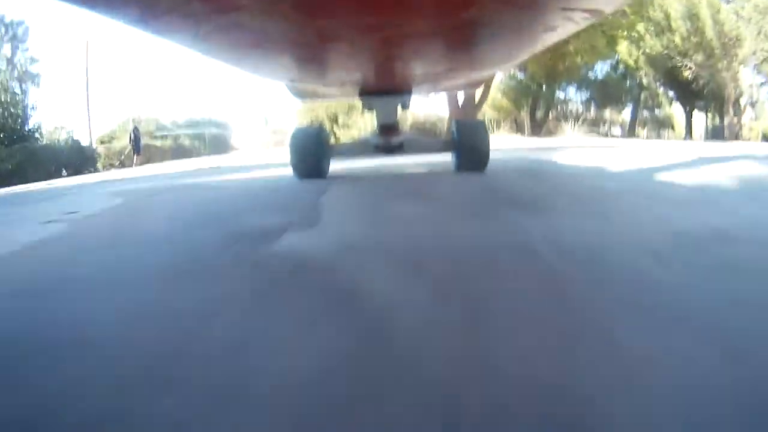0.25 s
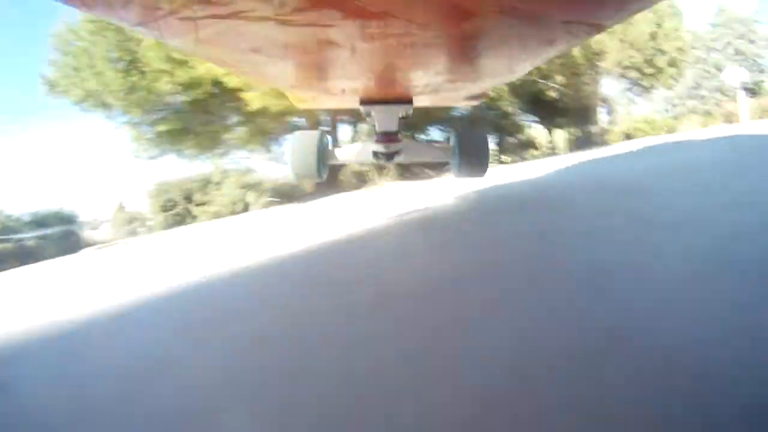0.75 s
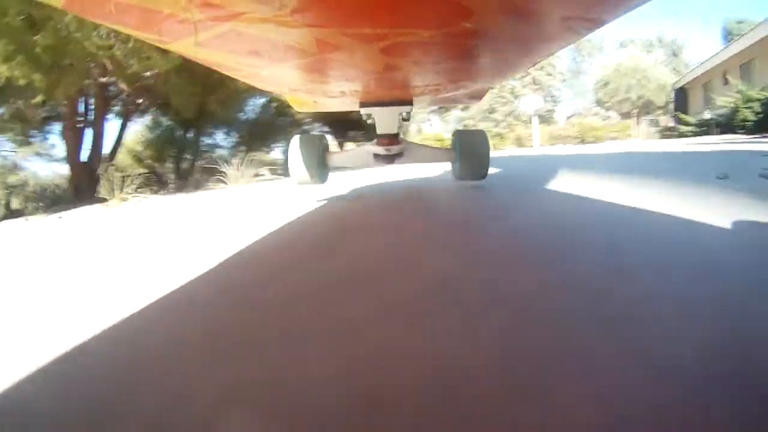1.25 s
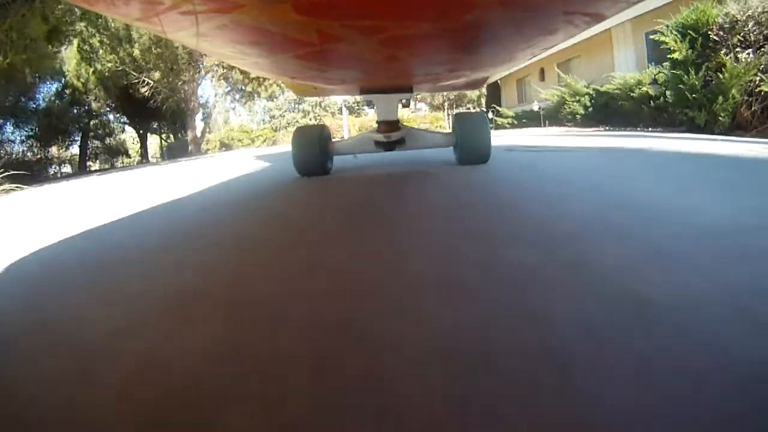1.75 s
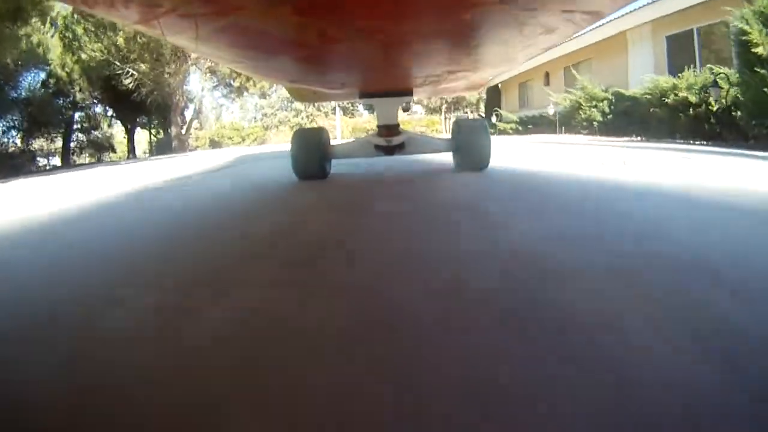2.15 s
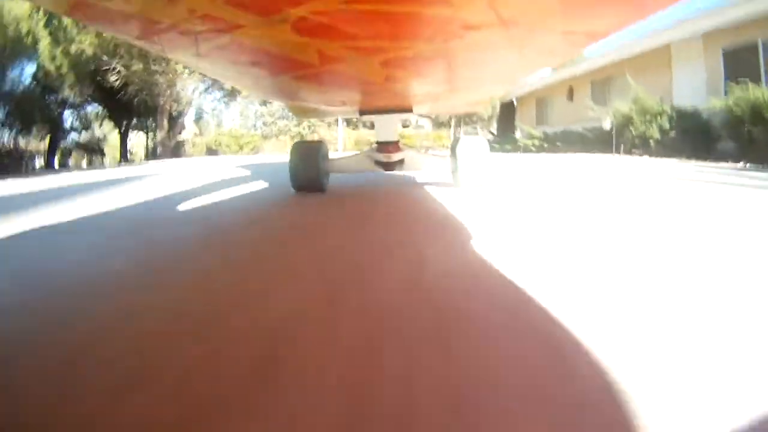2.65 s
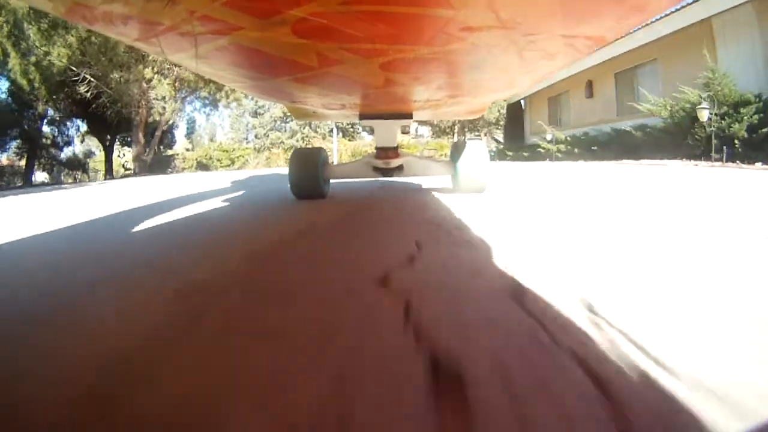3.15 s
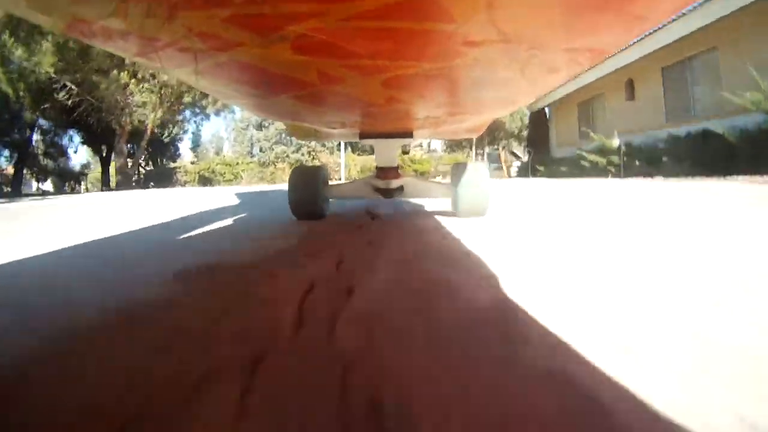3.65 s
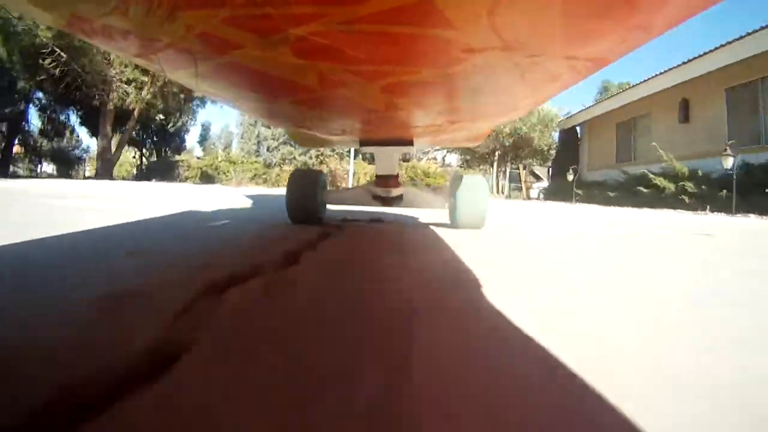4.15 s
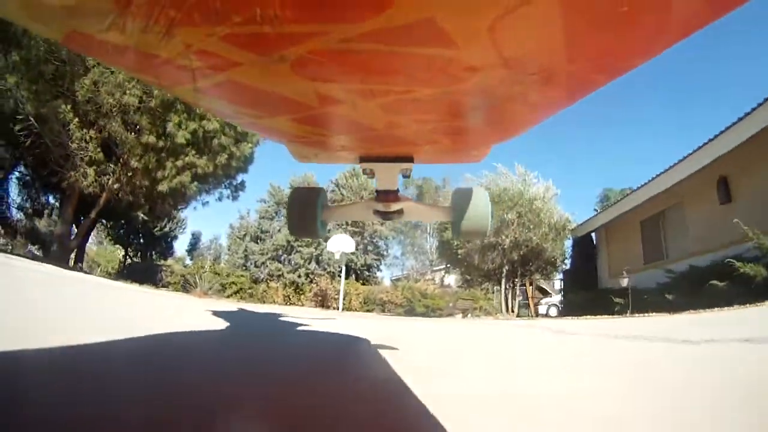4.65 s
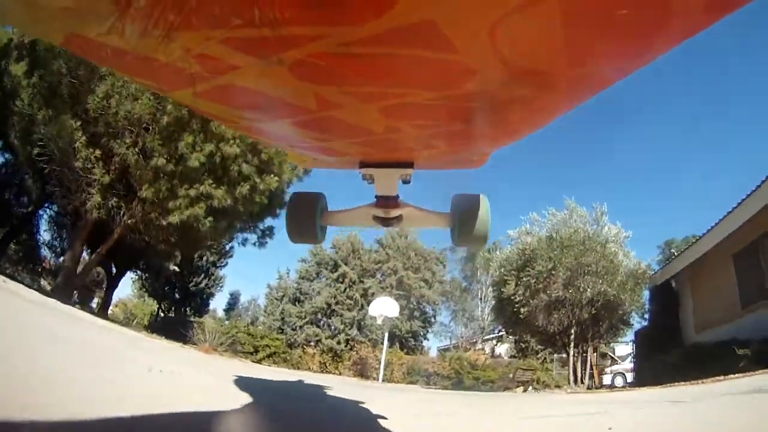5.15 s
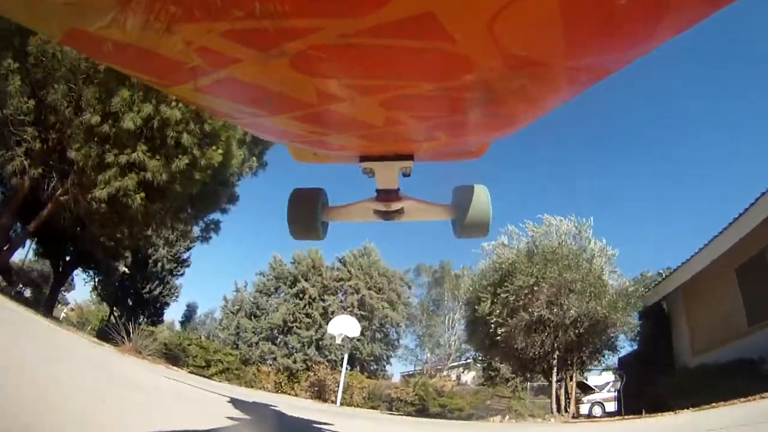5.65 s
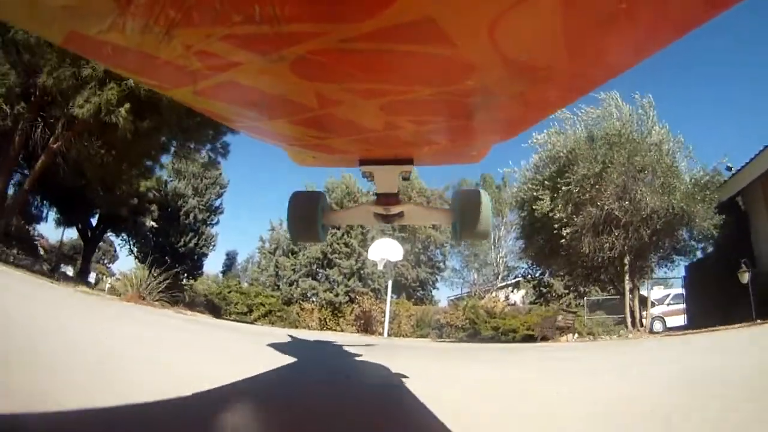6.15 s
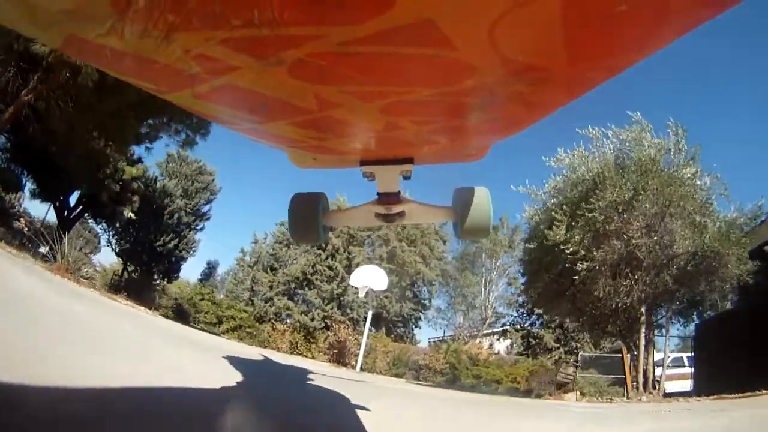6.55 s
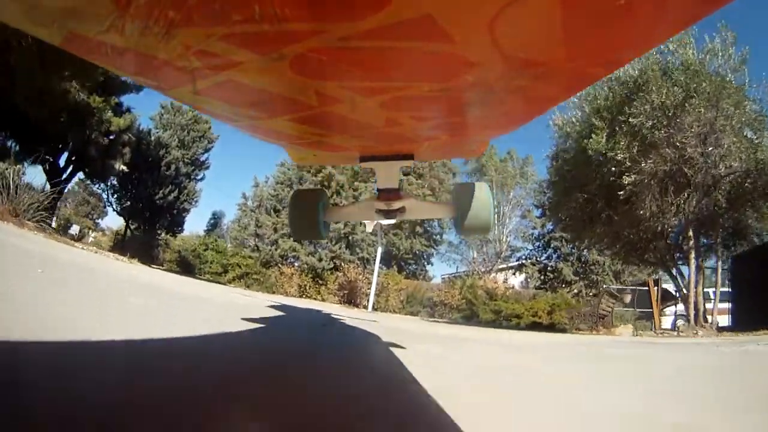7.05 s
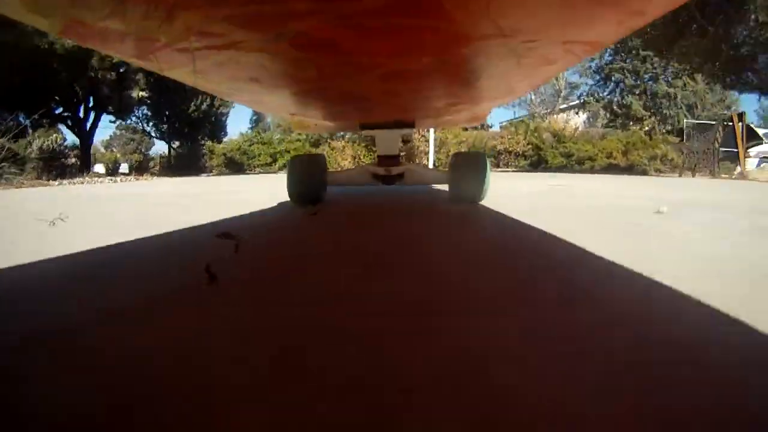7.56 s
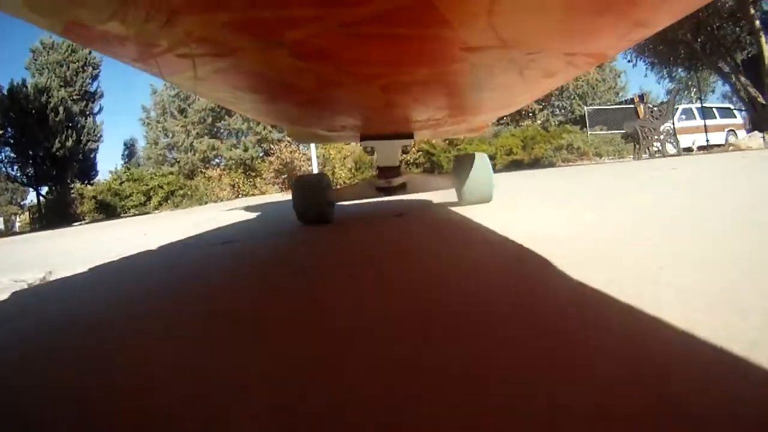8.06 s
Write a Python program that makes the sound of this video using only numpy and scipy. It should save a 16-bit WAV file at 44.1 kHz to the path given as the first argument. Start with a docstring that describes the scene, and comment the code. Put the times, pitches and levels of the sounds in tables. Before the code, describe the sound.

A microphone fixed under a skateboard deck catches hard wheels rolling on outdoor concrete: a low woody rumble, gritty hiss, rattling trucks and irregular clacks at cracks. A big bang comes as the nose lifts, then the roll turns duller and humming on the rear wheels. The tail scrapes roughly, briefly scrapes again, and the board slams back onto four wheels and rolls on.

```python
"""Wheels rumble and clack over concrete while loose metal rattles, heard by a camera under a skateboard's deck.
Noise drives the resonances of deck, wheels and trucks; single pushes make the clacks, and grit ticks.
Bearings chatter, turning tyres rasp, one wheel squeaks and wind flutters. Later the board rides on its
rear wheels, scrapes its tail twice and drops back. The camera turns loud sound down, clips it and
holds its samples coarsely, which adds a mirrored treble."""
import sys
import numpy as np
from scipy import signal
from scipy.fft import rfft, irfft
from scipy.io import wavfile
from scipy.ndimage import uniform_filter1d

SR = 44100
rng = np.random.default_rng(int(sys.argv[2]) if len(sys.argv) > 2 else 0)


def dump_mix(stems):
    """Bounce the given channels to the path in sys.argv[1] as a 16-bit WAV at rate SR."""
    frames = np.atleast_2d(stems).T  # one column per channel
    limited = np.clip(frames, -1, 1)  # hard clip at full scale
    pcm = np.round(limited * 32767).astype(np.int16)
    wavfile.write(sys.argv[1], SR, pcm)


N = 366471
TIME = np.arange(N) / SR  # seconds

# How hard the ground shakes the board, before patches and shudders.
# Each row: time in seconds, level in dB.
ROLL = [(0, -24.5), (.2, -36.5), (.36, -18.5), (.8, -20.5), (1.4, -25), (1.86, -16.5), (2.5, -23),
        (3.1, -22.5), (3.8, -23), (4.3, -16), (4.5, -21), (4.7, -17.5), (5.35, -15.5), (5.97, -23),
        (6.85, -19.5), (7.2, -14), (7.66, -20.5), (8, -15.5), (8.3, -17)]
# Rough, bumpy or sandy patches of concrete.
# Each row: middle in seconds, length in seconds, extra rumble in dB, extra bounce in dB, extra grit in dB.
PATCHES = [(0.506, 0.68, -2, 7, 1.5), (0.752, 0.18, 3.5, 1, 5), (1.112, 0.084, 2, 13, 9),
           (1.283, 0.14, 8.5, 15.5, 8), (2.024, 0.6, 2.5, 7, -0.5), (2.27, 0.15, 10, 10.5, 9.5),
           (2.46, 0.62, 2.5, 11.5, 3.5), (3.117, 0.37, 5.5, 15, 7), (3.4, 0.32, 5.5, 7.5, 8),
           (3.63, 0.24, 6.5, 20, 8.5), (3.99, 0.22, -1, 6, 0.5), (4.197, 0.21, 5, 7.5, 5),
           (4.776, 0.47, 4.5, 5, 10), (5.242, 0.21, 2.5, 6, 8), (5.833, 0.29, 5.5, 10.5, -0.5),
           (6.159, 0.33, 9.5, 15, 5), (6.476, 0.3, 7.5, 14, 5.5), (7.028, 0.23, 2, -12, 3.5),
           (7.293, 0.078, 7, 9, 5), (7.474, 0.21, 2, 17, 6.5), (7.777, 0.3, 2, 9.5, 4.5),
           (8.076, 0.14, -1, -12, 2.5), (8.236, 0.4, -3, 6, -2.5)]
# Wheels striking seams and cracks, tail and nose touching down.
# Each row: time in seconds, blow in dB, truck crack in dB relative to the blow,
# lift of the deck's high resonances in dB, thud on the wheels in dB relative to the deck's boom.
CLACKS = [(0.0868, 3.5, -3, -1, -19), (0.1026, 2.5, -4, 1, -30), (.139, 4, -16, -8, -13),
          (0.41, -3, -30, 4, -11), (0.581, -0.5, -27, -18, -10), (0.665, -2.5, -9, -4, -17),
          (0.706, -10.5, -18, -8, -20), (0.75, -3.5, -12, -6.5, -14), (0.849, -2.5, -20, -1, -7),
          (.951, -6.5, 1, -6, -28), (.957, 4.5, -14, 8.5, -32), (0.978, 2.5, -8, -8, -12.5),
          (1.115, -0.5, -8, -2, -20), (1.1235, 0.5, -8.5, -3.5, -31), (1.192, -5, -27, -4, -6),
          (1.240, -7, 2.5, -10, -10), (1.261, -5, 0.5, 5.5, -22), (1.4562, 11.5, -14, 2.5, -25),
          (1.466, 4.5, -9, 1, -28), (2.041, -0.5, -13, 4.5, -13), (2.0722, 6, -9, -9, -15),
          (2.197, -1, -9, -8, -23), (2.227, 1, -16, 7, -26), (2.241, 2, -3.5, -1, -25),
          (2.403, -1, -16, -21, -28), (2.415, 5, -9, -3.5, -7.5), (2.519, 4, -9, 3.5, -5),
          (2.6866, 8, -13.5, -5, -6.5), (2.703, -1, -7, -8, -7.5), (3.231, -6, -6, 2.5, -2),
          (3.498, 8.5, -10, -3, -7), (3.673, 6, -12, -5.5, -25), (4.37, -1.5, -9, 1, -16),
          (4.3838, 17, -20.5, -5.5, -24), (5.379, 3, -3, 19, -19), (5.668, 2, -8, 11, -19),
          (6.7348, -2, -2, 4, -19), (7.542, -3.5, -3, 5, -16), (7.6013, 16, -11, -1, -19.5),
          (7.771, 2.5, -12, -1.5, -3)]
# Resonances of the board bouncing on its wheels. Each row: pitch in Hz, width in Hz, strength in dB.
BOUNCE = [(84, 16, -11.5), (96, 58, 2), (152, 50, -2.5), (235.5, 37, -5.5)]
# Resonances of the metal trucks that hold the wheels. Each row: pitch in Hz, width in Hz, strength in dB.
TRUCK = [(1480, 4800, -8.5), (2910, 960, -3), (2950, 106, -13), (3610, 1540, -1), (5800, 3600, -7.5)]


def undb(db):
    """Turn decibels into a gain."""
    return 10 ** (np.asarray(db) / 20)


def unit(x):
    """Scale a signal to an rms (average strength) of 1."""
    return x / np.sqrt(np.mean(x ** 2))


def curve(rows):
    """Join rows of seconds and dB by straight lines; gives the gain at every sample."""
    return undb(np.interp(TIME, *np.transpose(rows)))


def walk(rate):
    """Wander at random with an rms of 1, moving in straight lines to a new level rate times a second."""
    step = int(SR / rate)
    levels = rng.standard_normal(N)[:N // step + 1]
    return unit(uniform_filter1d(np.repeat(levels, step), step)[:N])


def hump(middle_s, length_s):
    """A smooth rise and fall with a peak of 1."""
    shape = np.zeros(N)
    ends = np.searchsorted(TIME, [middle_s - length_s / 2, middle_s + length_s / 2])
    inside = slice(*ends)
    shape[inside] = np.cos(np.pi * (TIME[inside] - middle_s) / length_s) ** 2
    return shape


def swells(rows):
    """Add up smooth swells of gain from rows of middle in seconds, length in seconds and dB."""
    return sum(undb(db) * hump(s, length_s) for s, length_s, db in rows)


def response(modes, size=8192):
    """How a body with these resonances answers one sharp push; its peak is 1."""
    f = np.arange(size // 2 + 1) * SR / size
    power = sum(undb(db) ** 2 / (1 + (2 * (f - hz) / width) ** 2) ** 2 for hz, width, db in modes)
    # folding the cepstrum makes the ringing start at the push, never before it
    cepstrum = irfft(np.log(power) / 2)
    cepstrum[1:size // 2] *= 2
    cepstrum[size // 2 + 1:] = 0
    h = irfft(np.exp(rfft(cepstrum)))
    return h / np.abs(h).max()


def ring(force, modes):
    """Drive a resonant body with a force."""
    return signal.oaconvolve(force, response(modes))[:N]


def grains(rate, spread_db):
    """Random tiny impacts, about rate a second: most are small, a few are large."""
    hit = rng.random(N) < rate / SR
    size = undb(spread_db * np.minimum(rng.exponential(size=N), 4))
    return hit * size * rng.choice([-1, 1], N)


def contact(chatter, rise_s, decay_s, size=4096):
    """One push in mid-frame; noisy chatter swells as the wheel climbs the edge and dies as parts settle."""
    t = (np.arange(size) - size // 2) / SR
    force = chatter * rng.standard_normal(size) * np.exp(np.minimum(t / rise_s, -t / decay_s))
    force[size // 2] += 1
    return force


def add(track, sound, s, size=4096):
    """Mix in a sound whose contact lies half a frame in, so that the contact falls at time s."""
    place = np.arange(len(sound)) + int(s * SR) - size // 2
    inside = (place >= 0) & (place < N)
    track[place[inside]] += sound[inside]


def blows(times, dbs, chatter, rise_s, decay_s):
    """The force of a row of contacts."""
    force = np.zeros(N)
    for s, db in zip(times, dbs):
        add(force, undb(db) * contact(chatter, rise_s, decay_s), s)
    return force


def deck_modes(struck, lift_db=0):
    """The deck rings in other proportions when struck than when rolling; a sharp edge lifts its high pitches."""
    # Each row: pitch in Hz, width in Hz, strength when rolling in dB, strength when struck in dB.
    deck_rows = [(146, 105, -11.5, -3.5), (232, 122, -15, 0.5), (315, 65, -1.5, -3), (421, 204, -2.5, -1.5),
                 (534, 142, -0.5, 3), (597, 161, 2, -16), (715, 194, -29, -5), (1038, 245, -12.5, -6.5),
                 (1418, 177, -22, -14), (1960, 900, -31, -26.5)]
    modes = []
    for hz, width, rolling_db, struck_db in deck_rows:
        db = struck_db if struck else rolling_db
        modes.append((hz, width, db + lift_db * (hz > 900)))
    return modes


def nose_up():
    """Give 1 while the board rides on its rear wheels alone and 0 on all four, tilting steadily between."""
    up_s, down_s, tilt_s = 4.45, 7.55, 0.1
    return np.clip(np.minimum(TIME - up_s, down_s - TIME) / tilt_s + .5, 0, 1)


def shaken(level_db, decay_s):
    """Every clack sets off a shaking that soon dies away; level_db is for a 0 dB blow."""
    jolts = np.zeros(N)
    for s, db, *_ in CLACKS:
        jolts[int(s * SR)] = undb(level_db + db / 2)
    return signal.lfilter([1], [1, -np.exp(-1 / (decay_s * SR))], jolts)


def patches():
    """Extra rumble, bounce and grit in dB at every moment, as the patches pass under the wheels."""
    shapes = np.array([hump(s, length_s) for s, length_s, *_ in PATCHES])
    return np.transpose(PATCHES)[2:] @ shapes


def rolling():
    """Rough ground shakes the deck, bounces the soft wheels and hisses in the trucks; a lifted nose hums."""
    # Resonances of the freely swinging nose. Each row: pitch in Hz, width in Hz, strength in dB.
    nose_modes = [(90.6, 11, 3), (160.6, 15.4, 1), (338, 68, -2.5)]
    nose_db = -9.5  # relative to the ground's shaking
    bounce_db, lifted_bounce_db = -6, -8.5  # likewise, and its change with the nose up
    hiss_db, lifted_grit_db = -18, -9  # likewise
    # the whole board shudders briefly after a clack
    ground = np.hypot(curve(ROLL), shaken(level_db=-30, decay_s=0.03))
    lifted = nose_up()
    rough_db, bumpy_db, sandy_db = patches()
    texture = walk(rate=55)  # rougher and smoother spots pass under the wheels

    deck_force = rng.standard_normal(N) * undb(1.4 * texture)
    deck = unit(ring(deck_force, deck_modes(struck=False))) * undb(rough_db)

    wheels_level = undb(bounce_db + bumpy_db + lifted_bounce_db * lifted)
    wheels = unit(ring(rng.standard_normal(N), BOUNCE)) * wheels_level

    nose = unit(ring(rng.standard_normal(N), nose_modes)) * undb(nose_db) * lifted

    hiss_force = rng.standard_normal(N) * undb(4.3 * texture)
    hiss_level = undb(hiss_db + sandy_db + lifted_grit_db * lifted)
    hiss = unit(ring(hiss_force, TRUCK)) * hiss_level
    return (deck + wheels + nose + hiss) * ground


def taps(size=2000):
    """A loose part bounces at a roughly even rate, each tap with its own strength."""
    rate_hz, gap_spread_db, strength_spread_db = 119.9, 2.5, 6
    gap, strength = rng.standard_normal((size, 2)).T
    place = (np.cumsum(undb(gap_spread_db * gap)) * SR / rate_hz).astype(int)
    inside = place < N
    force = np.zeros(N)
    force[place[inside]] = undb(strength_spread_db * np.minimum(strength, 2))[inside]
    return force


def crush(force, length_s):
    """Spread each impact into a short burst of noise, swelling and fading around it."""
    t = np.arange(-256, 257) / SR
    burst = np.exp(-np.abs(t) / length_s)
    energy = signal.fftconvolve(force ** 2, burst / burst.sum(), "same")
    return np.sqrt(np.maximum(energy, 0)) * rng.standard_normal(N)


def rattle():
    """A loose part taps at a quick, even rate and rings the trucks, louder on rough or sandy ground and just
    after each clack."""
    base_db, lifted_db = -28.5, -8.5  # level, and its change with the nose up
    follow = 0.46  # share of the ground's level changes in dB that the rattle follows
    growth = 1.74  # dB of rattle per dB of extra grit
    _, _, sandy_db = patches()
    steady = curve(ROLL) ** follow * undb(base_db + growth * sandy_db + lifted_db * nose_up())
    shake = steady + shaken(level_db=-31.5, decay_s=0.029)
    runs = undb(2.5 * walk(rate=28))  # the taps come in stronger and weaker runs
    force = crush(taps() * runs, length_s=.0002)
    return unit(ring(force, TRUCK)) * shake


def bearings():
    """The balls rattle round their cage in quick, uneven pulses of narrow hiss."""
    # Spells of louder chatter. Each row: middle in seconds, length in seconds, level added in dB.
    spells = [(.45, .2, -43), (1.75, 0.26, -74), (7.7, 0.15, -18.5), (7.885, 0.14, -23.5),
              (8.24, 0.086, -29.5)]
    base_db = -46.5  # always present under the spells
    turns = np.cumsum(76 * undb(1.2 * walk(rate=34))) / SR  # around 76 pulses a second
    pulses = undb(14.0 * np.sin(2 * np.pi * turns))
    hiss = ring(rng.standard_normal(N) * pulses, [(3980, 200, 9.0), (4140, 1300, 2.0)])
    return unit(hiss) * (undb(base_db) + swells(spells))


def scrub():
    """In a turn, or as the nose lands, the tyres creep across the concrete in tiny slips: a rough rasp."""
    # Turns, and the nose landing at 7.7 s, in which the tyres scrub sideways. Each row: middle in seconds,
    # length in seconds, level in dB.
    carves = [(1.15, 3.9, -37), (2.0, 0.34, -26), (3.25, 2.1, -51), (4.16, 0.44, -29), (7.7, 0.13, -24.5),
              (8.1, 2.2, -42)]
    slips = grains(rate=4500, spread_db=8)
    rasp = ring(slips, [(1070, 100, 8), (1420, 180, -2.5), (1820, 940, -10.0)])
    return unit(rasp) * swells(carves)


def wind():
    """Moving air makes a deep, gusty flutter at the microphone."""
    # Each row: middle of the gust in seconds, length in seconds, level in dB.
    gusts = [(.3, 1.3, -33), (1.9, 0.66, -35), (4.2, 1.1, -28), (7.3, 1.1, -25.5)]
    flutter = ring(rng.standard_normal(N) * undb(2 * walk(rate=16)), [(28, 85, 0)])
    return unit(flutter) * swells(gusts)


def clacks():
    """A wheel hits an edge: the deck booms, the board bounces, and the truck cracks once the tyre is squeezed."""
    boom = np.zeros(N)
    thud = response(BOUNCE)
    for s, db, _, lift_db, thud_db in CLACKS:
        body = response(deck_modes(struck=True, lift_db=lift_db)) + undb(thud_db) * thud
        force = contact(chatter=0.064, rise_s=0.0035, decay_s=0.0047)
        add(boom, undb(db) * signal.fftconvolve(force, body), s)
    s, db, crack_db, _, _ = np.transpose(CLACKS)
    squeeze_s = 0.0016  # delay until the tyre is squeezed
    crack = blows(s + squeeze_s, db + crack_db, chatter=0.25, rise_s=0.0014, decay_s=0.0043)
    return boom + ring(crack, TRUCK)


def ticks():
    """Coarse grains snap against the wheels and ring the trucks, and the deck more faintly."""
    # The coarsest grains crushed under a wheel.
    # Each row: time in seconds, size in dB before the boost and delay shared by all.
    coarse_grains = [(.2906, -13.5), (0.3295, -10), (.3579, -7), (0.4594, -12.5), (0.5424, -10.5),
                     (0.5671, -8), (0.652, -9.5), (0.719, -12), (0.7797, -14), (1.944, -7.5), (1.9839, -6),
                     (2.2898, -3), (2.3034, -1.5), (3.0646, 1), (3.1945, -11.5), (3.3426, -12.5),
                     (3.4116, -19), (3.482, -7), (4.7151, -12), (4.7811, -4.5), (4.89, -12), (4.9555, -16),
                     (5.0642, -16), (5.076, -11), (5.178, -13.5), (5.8206, -14), (5.8967, -15.5),
                     (6.201, -15.5), (6.5174, -17.5), (6.6293, -13), (7.335, -9.5), (7.438, -11),
                     (7.463, -11.5), (8.017, -7), (8.034, -11), (8.0667, -12), (8.1448, -9.5),
                     (8.1925, -8.5)]
    s, db = np.transpose(coarse_grains)
    snap = blows(s + 0.00077, db + 8.0, chatter=0.04, rise_s=0.0011, decay_s=0.0027)
    return ring(snap, TRUCK) + undb(-17) * ring(snap, deck_modes(struck=False))


def squeak():
    """A tyre slips sideways and sings for a moment, rising in pitch with a fast, rough wobble."""
    middle_s, length_s, level_db = 0.354, 0.055, -23.5
    middle_hz, rise_hz_per_s = 4700, 16000
    glide = middle_hz + rise_hz_per_s * np.clip(TIME - middle_s, -length_s, length_s)
    pitch = glide * (1 + 0.03 * walk(rate=1400))
    return np.sin(2 * np.pi * np.cumsum(pitch) / SR) * undb(level_db) * hump(middle_s, length_s)


def rear_truck():
    """Under full load the rear bearings rub harder and bring out the truck's narrow resonances."""
    # The truck sings out as weight shifts on to it and off again.
    # Each row: middle in seconds, length in seconds, level in dB.
    songs = [(4.19, .3, -27.5), (7.2, 0.6, -29)]
    load = undb(-42) * nose_up() + swells(songs)
    rubbing = rng.standard_normal(N) * undb(2 * walk(rate=14))
    modes = [(1570, 280, -2.5), (2150, 430, -2.0), (3150, 580, 5.0), (4250, 1000, -1.5)]
    return unit(ring(rubbing, modes)) * load


def scrapes():
    """The wooden tail catches and slips thousands of times a second; the pressure sags until it lifts."""
    # The tail dragging on the concrete. Each row: start in seconds, end in seconds, starting level in dB.
    drags = [(5.387, 5.724, -11), (6.734, 6.778, -10)]
    # Resonances of the tail. Each row: pitch in Hz, width in Hz, strength in dB.
    tail_modes = [(261, 31, 5.5), (610, 460, -1), (1092, 150, 6), (1500, 570, -5.5), (2230, 960, -5.5),
                  (2800, 630, 0.5), (3220, 300, -6), (3900, 920, -3.5), (5350, 7500, -8.5)]
    sag_db_per_s, release_s = 10.5, 0.0065
    pressure = np.zeros(N)
    for start, end, db in drags:
        sagging = undb(db - sag_db_per_s * np.maximum(TIME - start, 0))
        release = np.exp(-np.maximum(TIME - end, 0) / release_s)
        pressure += (TIME > start) * sagging * release
    slips = grains(rate=5000, spread_db=2.0) * undb(2.24 * walk(rate=67))
    return unit(ring(slips, tail_modes)) * pressure


def scene():
    """Add up everything that reaches the microphone, as one channel."""
    wheels = rolling() + rattle() + bearings() + scrub() + squeak() + rear_truck()
    return (wheels + wind() + clacks() + ticks() + scrapes())[None]


def gain_control(x, threshold_db, strength, range_db, release_db_per_s, attack_s):
    """Loud sound pulls the gain down a moment later, within a limited range; it climbs back at a steady rate."""
    level_db = 10 * np.log10(np.maximum(uniform_filter1d(x ** 2, SR // 125), 1e-12))  # over 8 ms
    wanted = range_db * np.tanh(strength * np.maximum(level_db - threshold_db, 0) / range_db)
    # hold the deepest cut so far, less the steady climb since then
    climb = release_db_per_s * TIME
    cut_db = np.maximum.accumulate(wanted + climb) - climb
    # averaging over the past makes the cut arrive gradually
    k = int(attack_s * SR)
    return x * undb(-signal.fftconvolve(cut_db, np.ones(k) / k)[:N])


def record(dry):
    """Gain control, overload, then a converter that holds each sample and so mirrors sound into the treble."""
    hold_hz, top_hz = 12000, 15400  # rate of the held samples, and the final treble limit
    controlled = gain_control(dry[0], threshold_db=-9.0, strength=2.78, range_db=33.0,
                              release_db_per_s=156.0, attack_s=0.062)
    clipped = np.clip(controlled, -1, 1)
    f = np.arange(N // 2 + 1) * SR / N
    # a steep low-pass at 5400 Hz comes before the coarse sampling
    smooth = irfft(rfft(clipped) / np.sqrt(1 + (f / 5400) ** 36), N)
    # sampling makes mirror images around the hold rate; holding weakens them
    mirrored = smooth * (1 + 2 * np.cos(2 * np.pi * hold_hz * TIME))
    held = irfft(rfft(mirrored) * np.sinc(f / hold_hz), N)
    treble_limit = signal.ellip(10, .2, 70, top_hz, fs=SR, output="sos")
    return signal.sosfilt(treble_limit, np.clip(held, -1, 1))[None]


dry = scene()
out = record(dry)
dump_mix(out)
```